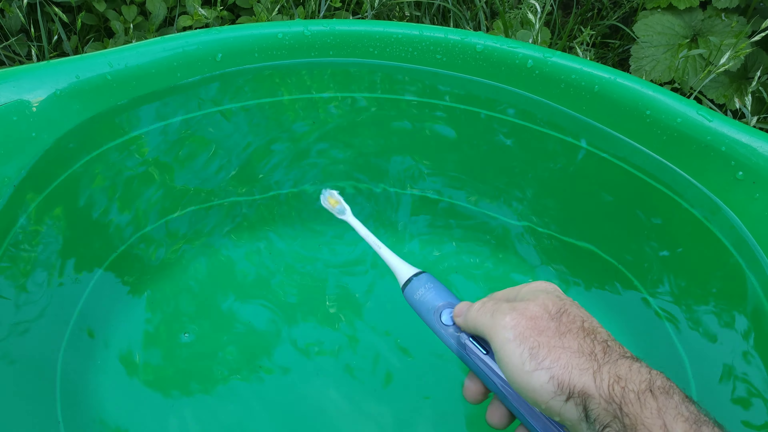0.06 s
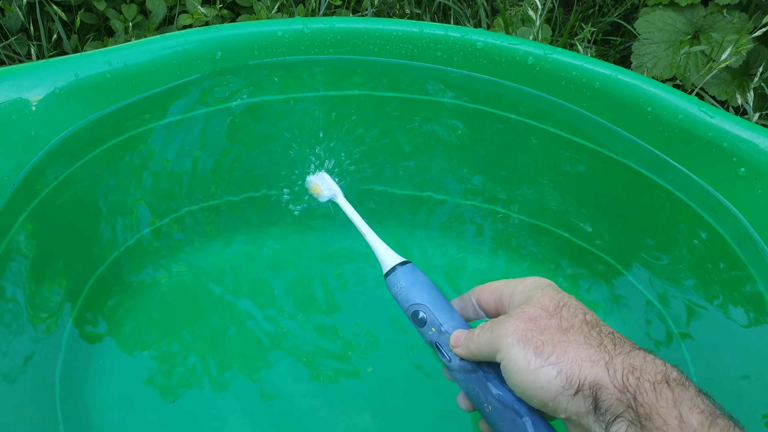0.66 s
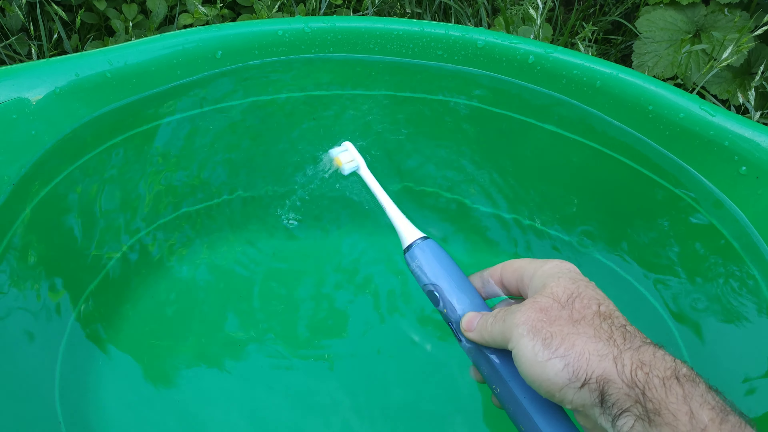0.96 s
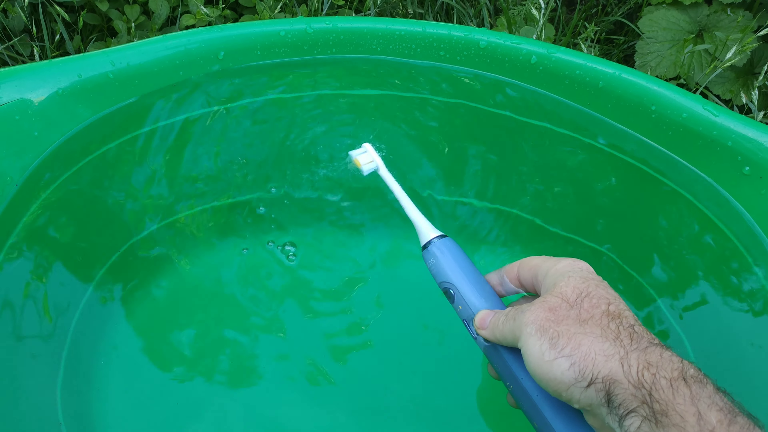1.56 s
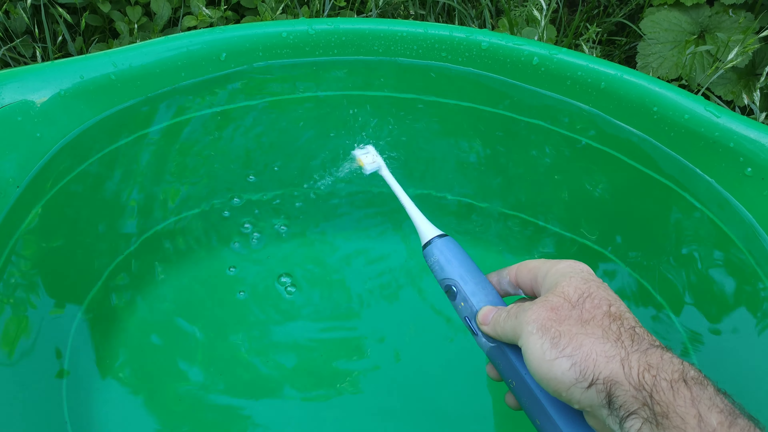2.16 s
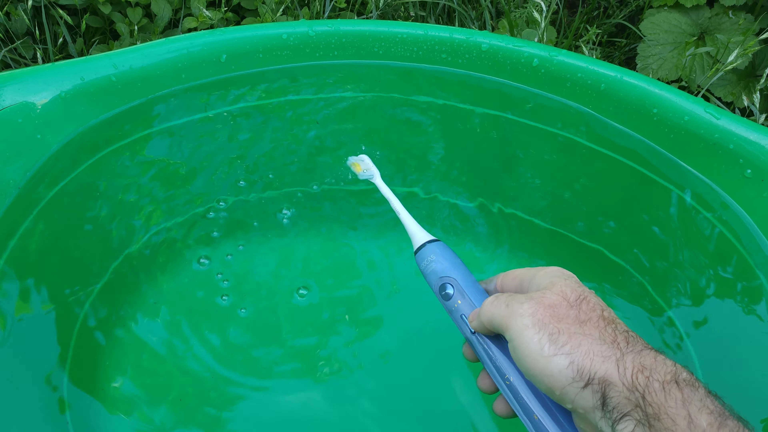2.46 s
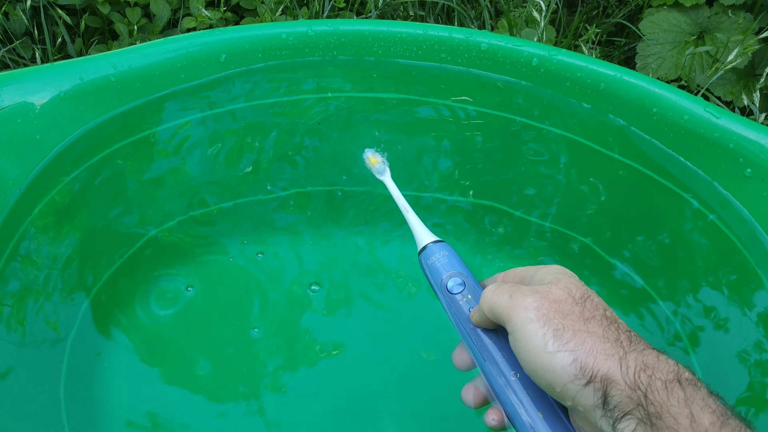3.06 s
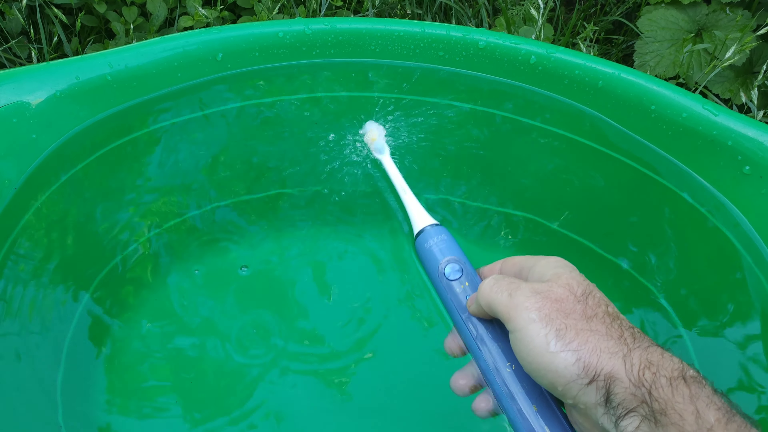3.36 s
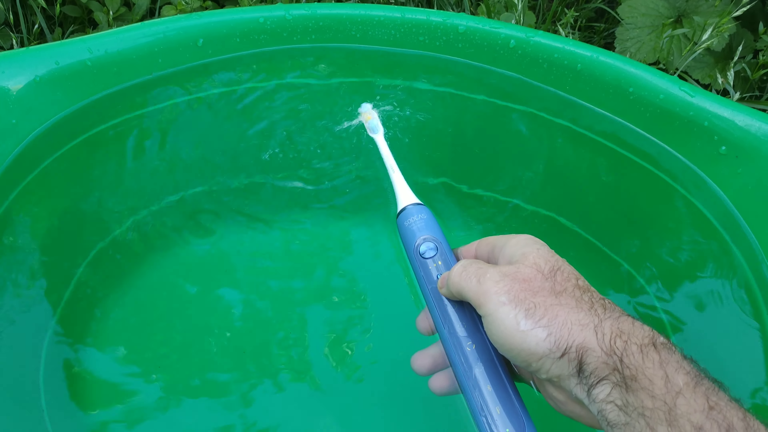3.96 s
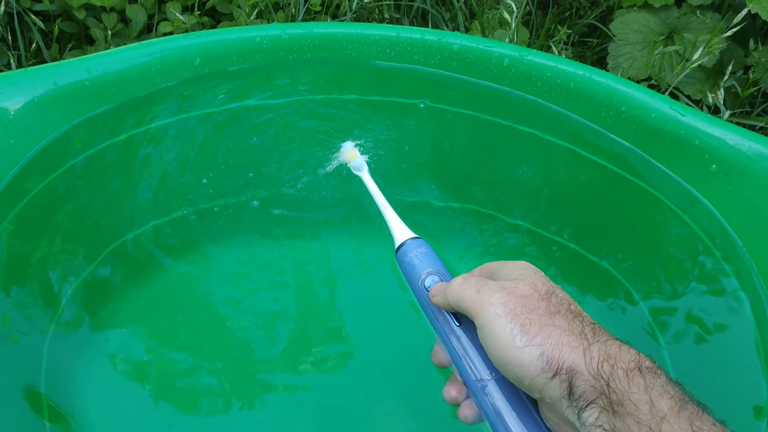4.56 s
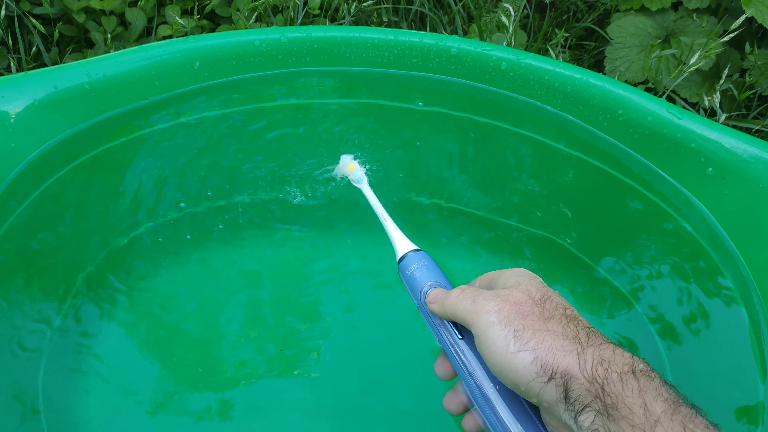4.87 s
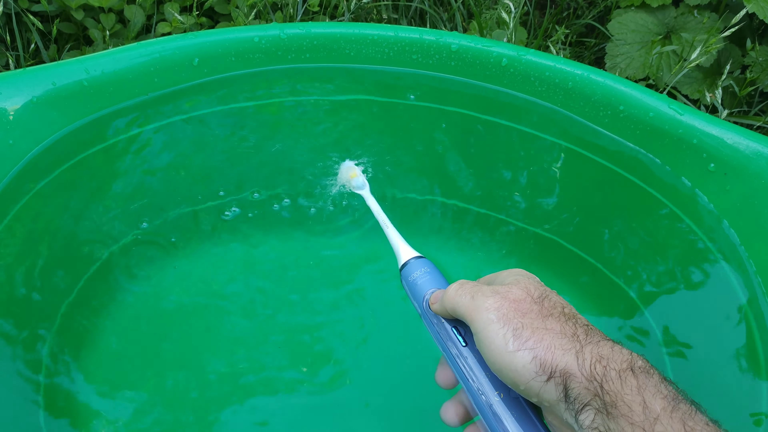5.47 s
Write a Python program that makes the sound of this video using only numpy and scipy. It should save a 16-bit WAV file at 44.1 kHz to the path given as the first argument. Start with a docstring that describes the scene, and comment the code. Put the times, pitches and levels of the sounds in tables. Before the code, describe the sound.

An electric toothbrush hums close by with a thin, high whine, over soft outdoor air. At about 0.2 seconds its head briefly touches water in a tub, giving a bright fizz and a few snapping drops. From 0.8 to 2.3 seconds it dips again: the hum becomes a fluttering buzz under a raspy, sputtering spray with small bubbles, loudest around 1.6 to 1.7 seconds in a flurry of sharp spatters. The head then lifts out, and the motor hums on with tiny drips and faintly fizzing foam. At 3.4 seconds it goes back in with a plink, and the buzzing and hissing spray continue to the end at about 5.5 seconds, with more snapping drops from 4.6 to 5.2. Underneath are a soft water rumble, a few slight low swells like wind on the microphone and a very faint distant hum.

```python
"""A sonic toothbrush hums in a garden tub; its head is dipped briefly, then twice for longer.
Water loads the head, so the hum turns into a fluttering buzz, and every stroke flings off a fizz of
tiny drops. Larger drops snap, bubbles are beaten into the surface and the stirred water rumbles.
Behind it all are soft outdoor air, a few deep swells and a faint far hum."""
import sys
import numpy as np
from scipy import signal
from scipy.fft import rfft, irfft
from scipy.io import wavfile
from scipy.ndimage import uniform_filter1d

SR = 44100
rng = np.random.default_rng(int(sys.argv[2]) if len(sys.argv) > 2 else 0)


def put_to_file(sound):
    """Save the sound as 16-bit audio at rate SR, in the file named by the first command-line argument."""
    columns = np.atleast_2d(sound).T  # one column per channel
    safe = np.clip(columns, -1, 1)
    whole_steps = np.round(safe * 32767)
    wavfile.write(sys.argv[1], SR, whole_steps.astype(np.int16))


N = 242991
T = np.arange(N) / SR
SIDES = np.array([[1], [-1]])  # left, right
STROKE_HZ, TOP_HZ = 297.27, 14300

# How deep the head sits. Each row: time in seconds, depth (0 in air, .5 at the surface, 1 covered).
HEAD_DEPTH = [(0.225, 0.12), (0.26, 0.56), (0.43, 0.56), (0.47, 0.094), (0.68, 0.4), (0.83, 0.29),
              (0.9, 0.43), (1.05, 0.6), (1.15, 0.72), (1.33, 0.66), (1.48, 0.54), (1.59, 0.7), (1.72, 0.54),
              (2.32, 0.51), (2.45, 0.18), (2.85, 0.13), (3.4, 0.084), (3.47, 0.88), (3.56, 0.54),
              (3.76, 0.67), (3.85, 0.86), (4.58, 0.84), (4.76, 0.64), (5.51, 0.58)]
# What the head stirs up. Each row: depth, then relative levels in dB of mist, churning and rumble.
STIR_BY_DEPTH = [(0, -3, -6, -74), (.25, -27, -15, -81), (.5, -18.5, -20.5, -74), (.7, -5, -26.5, -71),
                 (.85, -6.5, -19.5, -73), (1, 5, 7, -74)]
# The bristles meet the water. Each row: start, end and attack in seconds, relative fizz level in dB,
# relative lean to the left in dB.
BRISTLE_DIPS = [(0.223, 0.458, 0.053, -49.5, -4.5), (0.5, 0.65, 0.032, -68, -3),
                (0.649, 0.816, 0.014, -57, -4.5), (0.822, 2.333, 0.05, -49.5, -5),
                (3.396, 5.61, 0.031, -49.5, -3.5)]


def undb(db):
    """Decibels to gain."""
    return 10 ** (np.asarray(db) / 20)


def curves(table):
    """Each column of a table, joined by straight lines in time."""
    times, *columns = np.transpose(table)
    return [np.interp(T, times, column) for column in columns]


def by_depth(table):
    """Each column of a table, read at the head's present depth."""
    depths, *columns = np.transpose(table)
    return [np.interp(curves(HEAD_DEPTH)[0], np.sort(depths), column) for column in columns]


def unit(x):
    """Scale a stereo pair so that its centre has rms 1."""
    return x / np.sqrt(np.mean(x.mean(axis=0) ** 2))


def together(gains):
    """Joint strength of unrelated sounds: their powers add."""
    return np.sqrt(sum(gain ** 2 for gain in gains))


def swell(middle, length):
    """A bell-shaped rise and fall that stays above half power for the given length."""
    return 2 ** (-2 * ((T - middle) / length) ** 2)


def walk(rate):
    """Smooth random wander with spread 1, taking `rate` steps a second."""
    hold = max(int(SR / rate), 2)
    steps = np.repeat(rng.standard_normal(4096)[:N // hold + 2], hold)
    wander = uniform_filter1d(uniform_filter1d(steps, hold), hold // 2)[:N]
    return wander / wander.std()


def colour(x, points):
    """Causal filter with the given (Hz, dB) response."""
    hz, db = np.transpose(points)
    size = 1 << 18
    bin_hz = np.maximum(np.arange(size // 2 + 1) * SR / size, 1)
    cepstrum = irfft(np.log(undb(np.interp(np.log(bin_hz), np.log(hz), db))))
    cepstrum[1:size // 2] *= 2  # fold to minimum phase, so the ring follows the hit
    cepstrum[size // 2 + 1:] = 0
    return irfft(rfft(x, size) * np.exp(rfft(cepstrum)))[..., :N]


def tilt(x, pivot_hz, db):
    """Lift the band below the pivot as the band above it sinks, or the reverse."""
    bin_hz = np.arange(N // 2 + 1) * SR / N
    low = irfft(rfft(x) / (1 + (bin_hz / pivot_hz) ** 24), N)
    return low * undb(db) + (x - low) * undb(-db)


def stereo_phase(hz):
    """How far out of step left and right are: nearly opposed at 3 kHz, nearly together at 4 kHz."""
    # Each row: frequency in Hz, phase difference in radians.
    phase_gaps = [(300, .06), (600, .55), (900, .8), (1200, 1.4), (1490, 2), (1780, 1.55), (2080, 1.9),
                  (2380, 1.5), (2675, 1.7), (2900, 2.6), (3100, 2.85), (3300, 2.8), (3570, 1.5), (3850, .8),
                  (4080, .5), (4450, 1.4), (5000, 1.6), (8000, 1.8)]
    return np.interp(hz, *np.transpose(phase_gaps))


def place(x):
    """Share a diffuse sound between centre and sides, as left and right are in or out of step."""
    half_gap = stereo_phase(np.arange(N // 2 + 1) * SR / N) / 2
    mid = rfft(x[0] + x[1]) * np.cos(half_gap)
    side = rfft(x[0] - x[1]) * np.sin(half_gap)
    return (irfft(mid, N) + SIDES * irfft(side, N)) / np.sqrt(2)


def contact(start, end, attack, release_s=.027):
    """One dip: builds as the bristles enter, holds, and dies away when they leave."""
    return np.clip((T - start) / attack, 0, 1) * np.exp(-np.maximum(T - end, 0) / release_s)


def touching():
    """Near 1 while the bristles are in the water, 0 in the air."""
    return np.minimum(sum(contact(*span) for *span, _, _ in BRISTLE_DIPS), 1)


def wetness(grip):
    """How firmly the water holds the bristles, 0-1."""
    return np.clip(grip * curves(HEAD_DEPTH)[0], 0, 1)


def overtone(phase, order):
    """One multiple of the stroke rate, out of step between left and right."""
    offset = stereo_phase(order * STROKE_HZ) / 2 * SIDES
    return np.sqrt(2) * np.cos(order * phase + rng.uniform(0, 2 * np.pi) + offset)


def shudder(phase, order, rate):
    """The water tugs at the head and smears one multiple of the stroke into a narrow band."""
    band = sum(walk(rate) * overtone(phase + turn / order, order) for turn in (0, np.pi / 2))
    return wetness(grip=2.3) * band


def motor_hum(phase, smear=.28):
    """The drive's low tones, smeared by the water: stroke tone, octave, whine and a nasal fifth partial."""
    # One fader ride for each tone. Each row: time in seconds, relative level in dB.
    stroke_ride = [(0.0, -89), (0.21, -90), (0.26, -67.5), (0.35, -62), (0.5, -80), (0.75, -71), (0.8, -79),
                   (1.32, -61.5), (1.48, -71), (1.62, -64.5), (1.72, -69.5), (2.33, -68.5), (2.85, -83),
                   (3.3, -79), (3.45, -72.5), (3.75, -66), (5.06, -63.5), (5.51, -67)]
    octave_ride = [(0, -77.5), (0.5, -76.5), (0.7, -73), (1.03, -68.5), (1.13, -80), (1.4, -83), (1.6, -85),
                   (1.72, -68.5), (1.9, -68.5), (2.3, -68.5), (2.45, -82), (3.4, -83), (3.62, -68),
                   (3.85, -78), (4.1, -78), (5.51, -84)]
    whine_ride = [(0.0, -65.5), (0.97, -62.5), (1.24, -71.5), (1.3, -63.5), (1.52, -67.5), (1.56, -78),
                  (1.73, -65), (2.01, -65.5), (2.22, -63), (3.15, -72.5), (3.45, -66), (3.57, -77),
                  (3.85, -66), (3.94, -76.5), (4.57, -81), (4.71, -68), (4.91, -69.5), (5.51, -63.5)]
    nasal_ride = [(0, -72), (0.22, -96), (0.45, -74), (0.8, -69.5), (1.1, -67), (1.35, -62.5), (1.45, -69),
                  (1.6, -70), (2.35, -74), (2.65, -81), (3.38, -87), (3.46, -72.5), (3.95, -66),
                  (4.65, -70.5), (4.78, -78), (5.1, -87), (5.51, -60)]
    hum = undb(curves(stroke_ride)[0] + 0.52 * walk(25.07)) * overtone(phase, order=1)
    hum += undb(-82.5) * shudder(phase, order=1, rate=90)
    octave_gain = undb(curves(octave_ride)[0] - 2.2 + 2.5 * SIDES)
    hum += octave_gain * (overtone(phase, order=2) + smear * shudder(phase, order=2, rate=83))
    flutter = wetness(grip=0.88) * np.array([walk(34), walk(33)])
    whine_gain = undb(curves(whine_ride)[0] + 0.66 - 2.0 * SIDES + 1.3 * flutter)
    hum += whine_gain * overtone(phase, order=3) + undb(-78) * shudder(phase, order=3, rate=110)
    nasal_gain = undb(curves(nasal_ride)[0] - 0.9 - 2.0 * SIDES + 2.0 * walk(30))
    hum += nasal_gain * (overtone(phase, order=5) + smear * shudder(phase, order=5, rate=75))
    return hum


def motor_whistle(phase):
    """The drive's highest overtones make a thin, gently wavering whistle."""
    # Each row: multiple of the stroke rate, level in dB.
    partials = [(18, -101), (19, -100), (20, -86), (21, -94.5), (22, -81.5), (23, -85), (24, -100),
                (25, -84), (26, -88), (27, -76), (28, -74.5), (29, -75), (30, -79), (32, -85)]
    return sum(undb(db + 1.3 * walk(3.7)) * overtone(phase, round(order)) for order, db in partials)


def head_buzz(phase, grip_db=2.6, slip_rad=.085, bite_db=1.5):
    """Steady in air; in water the shifting grip on the head shakes each overtone in level and timing."""
    # Each row: multiple of the stroke rate, relative dB in air and in water, left minus right in dB.
    partials = [(4, -8, -2, -4), (6, -9, -6, 4.5), (7, 10.5, 6.5, -2.5), (8, -5, -0.5, 1.5),
                (9, -3, 5, -2.5), (10, 9, -5.5, 4), (11, 0, -9.5, -10), (12, -8, -8, -9),
                (13, -20, -1, -2.5), (14, -35, -4.5, 12), (15, -14, -2, -9), (16, -21, -7, -14),
                (17, -17, -18, 36)]
    # The water's load on the drive. Each row: depth, relative dB of the low and of the high overtones.
    water_load = [(0, -69, -64), (.25, -66, -73), (.45, -55.5, -75), (.56, -63.5, -65.5), (.68, -60, -65.5),
                  (1, -69.5, -62.5)]
    # Covered bristles bite into the water and buzz louder. Each row: depth, share of the full bite.
    bite_by_depth = [(.5, 0), (.7, 1)]
    low_db, high_db = by_depth(water_load)
    wet = wetness(grip=2.6)
    shake = wet * touching()
    lift_db = bite_db * shake * by_depth(bite_by_depth)[0]
    buzz = 0
    for order, air_db, water_db, pan_db in partials:
        order = round(order)
        grip = np.array([walk(28), walk(28)]) * shake
        slip = np.array([walk(80), walk(80)]) * shake
        load_db = low_db if order < 7 else high_db
        level_db = load_db + air_db + wet * (water_db - air_db) + lift_db - 13.0
        gain = undb(level_db + grip_db * grip + pan_db / 2 * SIDES)
        buzz = buzz + gain * overtone(phase + slip_rad * slip, order)
    return buzz


def garden_air(level_db=-74):
    """A soft bed of outdoor air that slowly rises and falls."""
    # Each row: frequency in Hz, gain in dB.
    air_eq = [(25, 4), (55, -34), (110, 1), (200, 4), (310, -30), (400, -4), (800, -2.5), (1300, -5),
              (3200, -9.5), (5000, -9.5), (6500, -7), (8000, -24), (10000, -13), (14000, -11)]
    return unit(colour(rng.standard_normal((2, N)), air_eq)) * undb(level_db + 0.9 * walk(0.56))


def far_hum(waver_hz=4):
    """A faint hum in the distance swells, fades and wavers in pitch."""
    # Each row: time in seconds, relative level in dB, pitch in Hz.
    hum_ride = [(0, -35, 424), (1.0, -17, 420), (1.4, -1, 422.3), (2.4, -2, 413), (2.65, 0, 421),
                (3.0, 3, 429), (3.5, -2, 422.6), (4.3, -14, 420), (5.1, 1, 425), (5.51, -16, 424)]
    swell_db, hz = curves(hum_ride)
    tone = np.sqrt(2) * np.sin(2 * np.pi * np.cumsum(hz + waver_hz * walk(50)) / SR)
    return tone * undb(swell_db - 78 + 2.0 * walk(24.9))


def water_rumble(wander_db=2.4):
    """Stirred water rumbles, widest in the bass, at a level that follows the head's depth."""
    # Tone of the rumble and of its side signal. Each row: frequency in Hz, gain in dB.
    rumble_eq = [(20, -4), (50, -3.5), (100, 4), (160, -0.5), (240, 6), (380, -2.5), (600, -10),
                 (900, -15.5), (1400, -53), (4000, -47)]
    side_eq = [(60, 0), (130, -4), (300, -12)]
    stir = rng.standard_normal(N) + SIDES * colour(rng.standard_normal(N), side_eq)
    level_db = by_depth(STIR_BY_DEPTH)[2] - 1.0 + wander_db * walk(15)
    return unit(colour(stir, rumble_eq)) * undb(level_db)


def drops(rate, scatter_db):
    """Tiny drops as dense clicks of unequal size, drawn separately for left and right."""
    hit = rng.random((2, N)) < rate / SR
    size = undb(scatter_db * np.minimum(rng.exponential(size=(2, N)), 4))
    return hit * size * rng.choice([-1, 1], (2, N))


def bubbles(centre_hz, spread, ring_s, range_db, count):
    """A cloud of bubbles of unequal size; each rings briefly, rising a little in pitch."""
    cloud = np.zeros((2, N))
    t = T[:int(5 * ring_s * SR)]
    fade = np.exp(-t / ring_s) * (1 - np.exp(-t / 0.00073))
    for when, pitch, size, lag in rng.random((count, 4)):
        hz = min(centre_hz * np.exp(spread * np.tan(2.6 * (pitch - .5))), TOP_HZ)
        ring = np.sin(2 * np.pi * hz * t * (1 + 0.64 * t) + np.pi * lag * SIDES)
        onset = int(when * (N - len(t)))
        cloud[:, onset:onset + len(t)] += undb(range_db * size) * fade * ring
    return cloud / cloud.std()


def rasp(x, share):
    """Each stroke partly repeats the one before, which gives the splashing a raspy pitch."""
    period = SR / STROKE_HZ
    feedback = share * np.exp(-2j * np.pi * period * np.arange(N // 2 + 1) / N)
    return irfft(rfft(x) / (1 - feedback), N)


def surging():
    """Gains of fizz, churning and froth as the head catches more water."""
    # Each row: middle and length in seconds, then relative levels in dB of fizz, churning and froth.
    surges = [(0.345, 0.15, -53, -55.5, -46), (0.764, 0.029, -50, -66, -72),
              (0.889, 0.075, -45, -52.5, -44.5), (0.96, 0.037, -40.5, -63, -55),
              (1.011, 0.064, -41.5, -53.5, -47), (1.19, 0.19, -44.5, -62.5, -62),
              (1.556, 0.03, -41.5, -64, -70), (1.598, 0.062, -38, -53.5, -55),
              (1.635, 0.031, -52, -49.5, -35), (1.672, 0.024, -33.5, -51.5, -66),
              (1.723, 0.057, -39.5, -56.5, -77), (1.792, 0.053, -43, -57, -49),
              (1.984, 0.17, -42, -57, -44.5), (2.196, 0.04, -45.5, -56, -48),
              (2.281, 0.081, -45.5, -58, -45.5), (3.487, 0.06, -52, -59, -67), (3.756, 0.03, -46, -59, -68),
              (3.838, 0.1, -48, -77, -78), (3.966, 0.15, -45, -70, -80), (4.30, 0.16, -47.5, -59.5, -80),
              (4.375, 0.029, -49, -65, -76), (4.465, 0.059, -45, -77, -78), (4.59, 0.025, -42, -59.5, -76),
              (4.626, 0.022, -40, -69, -70), (4.84, 0.33, -45.5, -66.5, -82), (5.15, 0.19, -47, -61.5, -70),
              (5.341, 0.13, -53, -56.5, -71), (5.5, 0.087, -47.5, -54, -70)]
    shapes = np.array([swell(middle, length) for middle, length, *_ in surges])
    gains = undb(np.array(surges)[:, 2:].T)
    return touching() * np.sqrt(gains ** 2 @ shapes ** 2)


def fizz(fling, pings, flow, ping_db):
    """Fine spray fizzes through a resonance near 8 kHz, swaying between dull and bright."""
    # Each row: frequency in Hz, gain in dB.
    fizz_eq = [(2000, -68), (3500, -55), (5000, -21), (5800, -11), (6600, -8), (7200, 2), (7700, 5),
               (8400, 3), (9000, -6.5), (9800, -11), (12000, -21.5)]
    clicks = rasp(drops(4600 * fling, scatter_db=-0.5), share=.17)
    sizzle = unit(colour(clicks, fizz_eq)) + undb(ping_db) * unit(colour(pings, fizz_eq))
    return tilt(sizzle * flow * undb(-2.0), pivot_hz=7660, db=1.6 * walk(16))


def mist(fling, pings, flow, ping_db):
    """The finest drops hiss above the fizz and shoot off the head in short jets."""
    # Each row: frequency in Hz, gain in dB.
    mist_eq = [(2500, -45), (7000, -20.5), (9000, 7.5), (10000, -0.5), (11200, 4.5), (11950, 6),
               (12500, 0.5), (13400, 12), (14100, 2)]
    # Each row: middle and length of a jet in seconds, relative level in dB.
    jets = [(1.116, 0.029, -43.5), (1.241, 0.014, -42.5), (1.604, 0.063, -50), (3.528, 0.05, -50),
            (3.853, 0.017, -40), (4.298, 0.024, -49), (4.387, 0.034, -44), (4.636, 0.03, -44),
            (5.192, 0.024, -45)]
    jetting = together([undb(db) * swell(middle, length) for middle, length, db in jets])
    clicks = drops(7000 * fling, scatter_db=-7.0)
    hiss = unit(colour(clicks, mist_eq)) + undb(ping_db) * unit(colour(pings, mist_eq))
    return hiss * together([flow * undb(by_depth(STIR_BY_DEPTH)[0] + 1.0), jetting * undb(-5.0)])


def churning(fling, share):
    """Coarse drops torn from the surface, repeating in part from stroke to stroke."""
    # Each row: frequency in Hz, gain in dB.
    churn_eq = [(900, -47.5), (1600, -16), (2000, -6), (2400, -14), (2750, -13), (3000, 2.5), (3400, -1.5),
                (3800, 2), (4200, -1), (5000, 4.5), (6000, 8.5), (7500, -5.5)]
    clicks = rasp(drops(3500 * fling, scatter_db=3.5), share)
    return unit(place(colour(clicks, churn_eq)))


def spray_pan(dry_lean_db=-3.5):
    """Left and right gains of the fine spray: right of centre, shifting a little with each dip."""
    shift_db = sum((lean - dry_lean_db) * contact(*span) for *span, _, lean in BRISTLE_DIPS)
    pan_db = dry_lean_db + shift_db - 2.0
    return undb(SIDES * pan_db / 2) / np.cosh(pan_db * np.log(10) / 20) ** .5  # constant power


def spray(phase, ping_db=-5.5):
    """Each stroke flings drops off the bristles in uneven spurts: fizz, mist and coarse churning."""
    fizz_surge, churn_surge, _ = surging()
    damp_bristles = undb(-73)  # a trace of spray even in the air
    steady = together([damp_bristles] + [undb(db) * contact(*span) for *span, db, _ in BRISTLE_DIPS])
    flow = together([steady, fizz_surge])
    fling = 1 + 0.25 * np.cos(phase) + 0.1 * np.cos(2 * phase)  # drop rate pulses with the stroke
    sputter = undb(0.2 * walk(19.0) + 1.6 * walk(90) + 0.26 * walk(430))
    pings = bubbles(centre_hz=8600, spread=.17, ring_s=.003, range_db=13, count=4500)  # droplets land
    fine = fizz(fling, pings, flow, ping_db) + mist(fling, pings, flow, ping_db)
    coarse = churning(fling, share=.68) * steady * undb(by_depth(STIR_BY_DEPTH)[1] + 3.5)
    coarse += churning(fling, share=.25) * churn_surge * undb(0.6)
    return fine * sputter * spray_pan() + coarse * undb(2.0 * walk(45) - .9 * SIDES)


def snaps(ring_s=.002):
    """A large drop snaps off the bristles and bursts in a ringing flurry a few milliseconds long."""
    # Each row: start in seconds, relative level in dB.
    hits = [(0.246, -30), (0.294, -28.5), (0.332, -31), (0.357, -33), (0.378, -31), (0.951, -28),
            (0.979, -31), (1.026, -23), (1.055, -23.5), (1.183, -29), (1.544, -23.5), (1.586, -20),
            (1.612, -20), (1.615, -19.5), (1.658, -15), (1.671, -13.5), (1.675, -16), (1.711, -19),
            (1.715, -24), (1.729, -27), (1.764, -28), (2.021, -28), (2.19, -32), (2.284, -24), (2.319, -38),
            (3.413, -36), (3.431, -37), (3.851, -33), (4.215, -36), (4.378, -33), (4.472, -35),
            (4.586, -29), (4.628, -21), (4.814, -26), (4.816, -24), (4.933, -25), (5.091, -26),
            (5.186, -27)]
    # Each row: frequency in Hz, gain in dB.
    snap_eq = [(2000, -63), (5000, -29), (6500, -6), (7300, 1.5), (7800, 4.5), (8500, 4), (9300, -9.5),
               (12000, -32)]
    bursts = np.zeros((2, N))
    t = T[:600]
    fade = np.exp(-t / ring_s) * (1 - np.exp(-t / 0.0003))
    for start, db in hits:
        onset = int(start * SR)
        bursts[:, onset:onset + len(t)] += undb(db + 1.0) * fade * rng.standard_normal((2, len(t)))
    return colour(bursts, snap_eq) * undb(-3.0 * SIDES)


def froth(gurgle_db=-14):
    """In a surge the head beats millimetre bubbles into the water, and larger ones that gurgle."""
    small = bubbles(centre_hz=2870, spread=.075, ring_s=.004, range_db=13, count=4500)
    small = place(rasp(small, share=.25))
    large = bubbles(centre_hz=1900, spread=.14, ring_s=.004, range_db=10, count=2000)
    return (small / small.std() + undb(gurgle_db) * large) * surging()[2] * undb(-14.5 - 0.41 * SIDES)


def drips(ring_s=.005, rise=.9):
    """A falling drop traps a tiny bubble whose pitch climbs as it fades."""
    # Each row: start in seconds, level in dB, bubble pitch in Hz.
    landings = [(0.393, -44, 2020), (0.522, -57, 7100), (0.635, -49.5, 5230), (0.666, -41, 8260),
                (0.774, -57, 7800), (0.905, -40, 2870), (0.925, -47, 2660), (1.638, -37, 2920),
                (1.945, -58, 3370), (2.02, -64, 2750), (2.251, -52.5, 2720), (2.407, -52, 7760),
                (2.492, -52, 7100), (2.543, -53, 7500), (2.592, -53, 6900), (2.715, -53, 7700),
                (2.782, -59, 6700), (2.899, -59, 7000), (2.951, -51, 8150), (3.497, -37, 3180),
                (5.194, -47, 2980), (5.285, -49, 4170), (5.324, -49, 3980)]
    plinks = np.zeros((2, N))
    t = T[:2000]
    fade = np.exp(-t / ring_s) * (1 - np.exp(-t / 0.00051))
    for start, db, hz in landings:
        ring = np.sin(2 * np.pi * hz * t * (1 + rise * t) + stereo_phase(hz) / 2 * SIDES)
        onset = int(start * SR)
        plinks[:, onset:onset + len(t)] += undb(db) * ring * fade
    return plinks


def low_swells():
    """Short, deep swells of rumble, like wind on the microphones."""
    # Each row: middle and length in seconds, relative level in dB.
    swells = [(1.2, 0.06, -66), (1.63, 0.06, -66), (2.23, 0.07, -75), (3.79, 0.1, -70),
              (4.34, 0.075, -66.5), (4.85, 0.09, -70), (4.97, 0.06, -71), (5.14, 0.07, -73)]
    # Each row: frequency in Hz, gain in dB.
    bass_eq = [(20, -36), (45, -5), (75, 3.5), (120, 2.5), (170, -10), (400, -44), (1500, -60)]
    envelope = together([undb(db) * swell(middle, length) for middle, length, db in swells])
    return unit(colour(rng.standard_normal((2, N)), bass_eq)) * envelope * undb(-5.5 - 3.1 * SIDES)


def foam(start_s=2, fade_s=0.71, level_db=-69.5):
    """Foam left on the water goes on fizzing faintly as it dies away."""
    fade = (T > start_s) * np.exp(-np.maximum(T - start_s, 0) / fade_s)
    prickle = bubbles(centre_hz=8870, spread=.14, ring_s=.0013, range_db=10, count=4000)
    return prickle * fade * undb(level_db)


def scene():
    """One stroke cycle drives the hum and the spray, over the water and the garden."""
    phase = 2 * np.pi * STROKE_HZ * T
    brush = motor_hum(phase) + motor_whistle(phase) + head_buzz(phase)
    splash = spray(phase) + snaps()
    bubbling = froth() + foam() + drips()
    bed = garden_air() + water_rumble() + low_swells() + far_hum()
    return brush + splash + bubbling + bed


def record(dry):
    """A steep low-pass cuts the very top."""
    return signal.sosfilt(signal.ellip(10, .2, 70, TOP_HZ, fs=SR, output="sos"), dry)


dry = scene()
out = record(dry)
put_to_file(out)
```